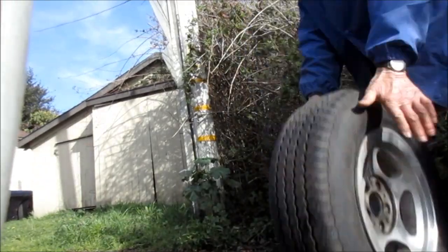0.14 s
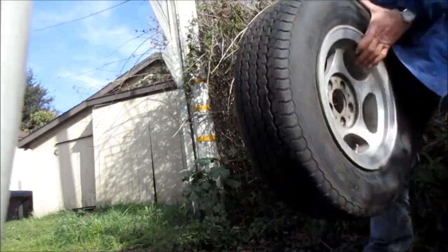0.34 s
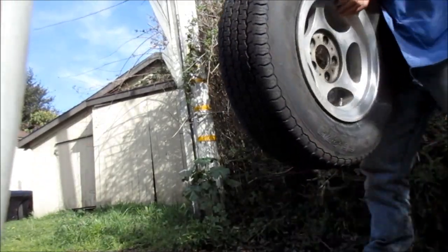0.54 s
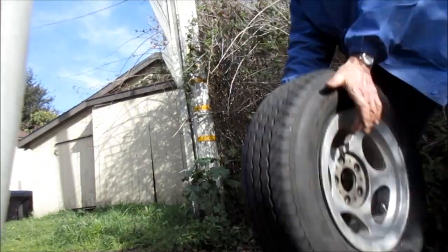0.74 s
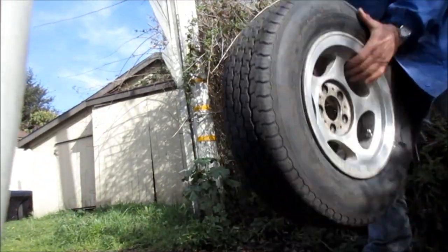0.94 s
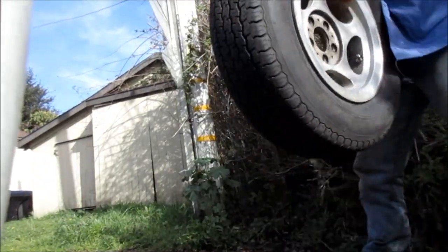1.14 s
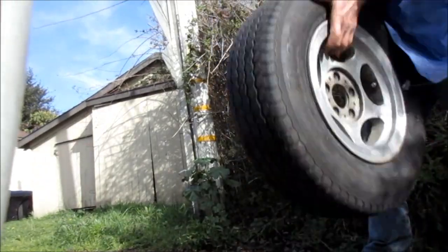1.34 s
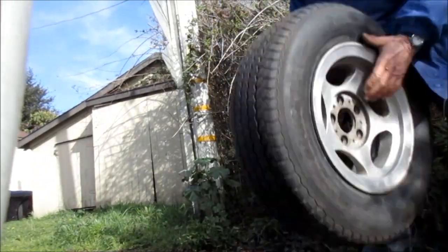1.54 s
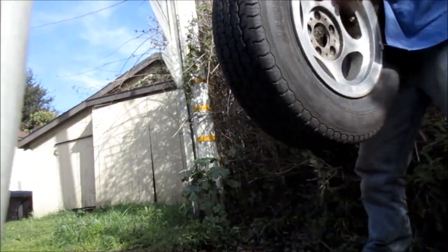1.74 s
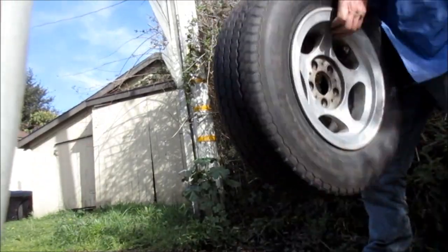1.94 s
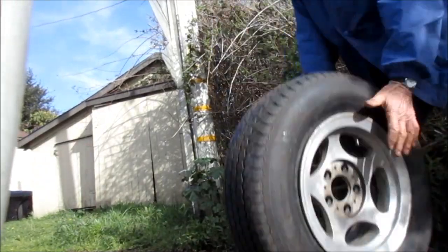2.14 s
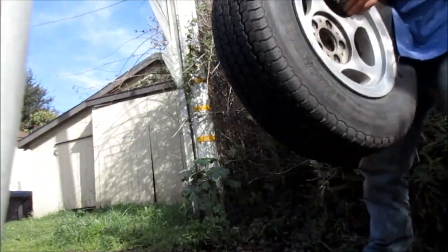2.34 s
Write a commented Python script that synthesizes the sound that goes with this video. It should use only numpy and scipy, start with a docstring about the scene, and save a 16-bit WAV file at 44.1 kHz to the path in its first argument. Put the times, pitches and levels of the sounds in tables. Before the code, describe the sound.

Four slapping thuds of a bounced car tire, with a faint jacket swish between them.

```python
"""A bouncing car tire

A tire on an alloy wheel is bounced four times on hard ground in a quiet yard. Each landing
squeezes air from under the tread with a sharp slap, crunches grit, makes the tire's body thud
and leaves the wheel ringing faintly. Between bounces, hands pat the rubber and a nylon jacket
swishes and squeaks, over a low outdoor hum."""
import sys
import numpy as np
from scipy import signal
from scipy.fft import rfft, irfft
from scipy.io import wavfile

SR = 44100
rng = np.random.default_rng(int(sys.argv[2]) if len(sys.argv) > 2 else 0)


def to_wav(sig):
    """Store sig (one row per channel, or 1-D mono) as 16-bit WAV at the path in sys.argv[1].

    Samples outside -1..1 are clipped; the rate is SR.
    """
    pcm = np.clip(np.atleast_2d(sig), -1, 1) * 32767
    pcm = np.round(pcm).astype(np.int16)
    wavfile.write(sys.argv[1], SR, pcm.T)  # frames by channels


N = 110250
TIME = np.arange(N) / SR

# The four landings and the strength of each part of their sound. Columns: start_s, slap_db, rise_ms,
# groove_db, second_contact_db, thud_db, knock_db, scrub_db, crunch_db, wheel_db
LANDINGS = [(.2323, -4, 0.2, -8.5, -1.5, -1.5, -34, -31, -27.5, -45.5),
            (.8596, -3.5, 0.13, -5.5, -13, -3, -39, -34, -30, -45.5),
            (1.5010, -8.5, 0.16, -4.5, -13, -5.5, -33.5, -33.5, -33, -55),
            (2.1356, -17.5, 0.18, -9, -16, -5, -22.5, -33.5, -29, -50.5)]


def tire():
    """Each landing slaps, flattens the tread and sets the grooves, body and sidewall ringing."""
    # Notes of the tire's body and the air inside it: pitch_hz, relative_db, fade_s
    body_notes = [(81, -24.5, 0.15), (159, -26.5, 0.18), (196.4, -38.5, 0.21), (260, -24, 0.051),
                  (295.3, -29, 0.14), (325.4, -26.5, 0.086), (370, -65, 0.044), (460, -34, 0.09),
                  (513, -39, 0.088), (624, -39, 0.062), (723, -48, 0.069)]
    # Notes of the air in the tread grooves: pitch_hz, relative_db, fade_s
    groove_notes = [(1220, -7.5, 0.0086), (1988, -0.5, 0.0051), (1664, -23, 0.055), (929, -31.5, .06),
                    (1310, -25, 0.078)]
    belt_note = (119, -28.5, 0.29)  # the lasting low boom of the belt under the tread
    squash_note = (44.7, -19, 0.12)  # the whole wheel bobs on its springy sidewall
    knock_hz, knock_fade_s = 319.6, 0.1
    out = np.zeros(N)
    for start, slap_db, rise_ms, groove_db, second_contact_db, thud_db, knock_db, *_ in LANDINGS:
        out += from_db(slap_db) * slap(start, rise_ms)
        out -= from_db(groove_db) * ring(start, groove_notes)
        # The rest of the tread lands a moment later.
        out -= from_db(second_contact_db) * bump(start + 0.00212, width_ms=0.17)
        bulge = from_db(-19) * bump(start + 0.00406, width_ms=0.55)  # the sidewall pushes out
        returning_wave = from_db(-26) * bump(start + 0.0229, width_ms=0.81)  # once round the tread
        body = ring(start, body_notes + [belt_note])
        out += from_db(thud_db) * (ring(start, [squash_note]) + bulge + returning_wave - body)
        out += ring(start, [(knock_hz, knock_db, knock_fade_s)])  # the sidewall knocks
    return out


def slap(start, rise_ms):
    """Pressure climbs as air is squeezed from under the tread, then snaps into suction."""
    suction_share, suction_ms = 0.32, 0.05
    ms = (TIME - start) * 1000
    return pulse(-ms / rise_ms) - suction_share * pulse(ms / suction_ms)


def wheel():
    """The metal wheel rings with one long pure note, stopped and struck anew by every landing."""
    pitch_hz, fade_s = 290.3, 3.05
    out = ring(0, [(pitch_hz, -54.5, fade_s)])  # already ringing faintly at the start
    for start, *_, wheel_db in LANDINGS:
        out = out * (TIME < start) + ring(start, [(pitch_hz, wheel_db, fade_s)])
    return out


def grit():
    """Grit crunches at first touch, is scrubbed under the squashed tire and ticks as it lifts off."""
    # Tone of the tread scrubbing on grit: pitch_hz, relative_db
    scrub_tone = [(300, 18), (600, 10), (1000, 3.5), (1400, -6), (1900, -1), (2700, -8), (4000, -21.5),
                  (8000, -65), (16000, -59)]
    # Tone of the crunching grit: pitch_hz, relative_db
    crunch_tone = [(500, 3), (1900, 10), (3500, -4), (7000, -11.5), (12000, -21.5), (16000, -32)]
    scrub = crunch = 0
    for start, *_, scrub_db, crunch_db, _ in LANDINGS:
        scrub += from_db(scrub_db) * decay(start, fade_s=0.096, hold_s=0.021)
        lift_off = from_db(-40.5) * decay(start + 0.0222, fade_s=0.016)
        crunch += from_db(crunch_db) * decay(start, fade_s=0.052) + lift_off
    return scrub * noise(scrub_tone) + crunch * noise(crunch_tone)


def stones():
    """Small stones snap as the tread hits them, each with a tiny high ping."""
    # Cracking stones: start_s, level_db, pitch_hz, fade_s
    snaps = [(0.2326, -23.5, 5460, 0.0046), (0.2323, -24.5, 7720, 0.0029), (0.2323, -22, 12100, 0.0015),
             (0.8591, -25, 5500, 0.0041), (1.5025, -24, 2970, 0.0088), (1.5019, -21.5, 7500, 0.0016),
             (2.1349, -33.5, 4300, 0.0045)]
    return sum(ring(start, [(hz, db, fade_s)]) for start, db, hz, fade_s in snaps)


def hands():
    """Hands pat the rubber softly, while grit and cloth give small ticks."""
    # Touches of the hands: start_s, level_db
    pat_events = [(.158, -46.5), (.185, -46.5), (0.31, -50.5), (.803, -46), (1.009, -47), (1.585, -51),
                  (1.633, -43), (2.077, -47), (2.223, -45), (2.295, -42.5)]
    # Dull tone of a pat: pitch_hz, relative_db
    pat_tone = [(100, -11), (400, 6.5), (750, 5.5), (1500, -9), (3000, -11.5), (8000, -35), (16000, -35)]
    # Ticks of grit and cloth: start_s, level_db
    tick_events = [(0.295, -51.5), (0.998, -50), (1.27, -46), (1.922, -49), (2.296, -47.5)]
    # Bright tone of a tick: pitch_hz, relative_db
    tick_tone = [(1000, -21), (3000, 3), (7500, 9), (11000, 0.5), (16000, -12)]
    pats, rise_s = 0, 0.0047
    for start, db in pat_events:
        rise = np.clip((TIME - start) / rise_s, 0, 1)
        pats += from_db(db) * rise * decay(start, fade_s=0.12)
    ticks = sum(from_db(db) * decay(start, fade_s=0.018) for start, db in tick_events)
    return pats * noise(pat_tone) + ticks * noise(tick_tone)


def jacket():
    """Nylon sleeves swish and crinkle; fast strokes are brighter."""
    # How the swish rises and falls: time_s, relative_db
    strokes = [(0, -67), (.08, -67.5), (.15, -54.5), (.21, -55.5), (.28, -64.5), (.32, -59), (.38, -48),
               (.47, -54), (.6, -55), (.7, -64), (.78, -57.5), (.84, -56.5), (.91, -62.5), (1.03, -54.5),
               (1.14, -59.5), (1.26, -53.5), (1.34, -67.5), (1.43, -51.5), (1.48, -55.5), (1.55, -65),
               (1.63, -53.5), (1.74, -63.5), (1.84, -59), (1.98, -69.5), (2.09, -60), (2.17, -64.5),
               (2.24, -55), (2.32, -50), (2.38, -61), (2.5, -51.5)]
    # Tone of rubbing nylon: pitch_hz, relative_db
    nylon_tone = [(300, 9), (700, 10.5), (1400, 5.5), (2800, 3), (4500, -0.5), (6500, 3.5), (8000, -0.5),
                  (10000, -3.5), (13000, -10), (16000, -15)]
    # Tone of the bright hiss of fast strokes: pitch_hz, relative_db
    hiss_tone = [(6000, -6), (9000, -4), (13000, -2), (16000, 6)]
    folds_per_s, fold_spread_db, flutter_db = 300, 3, 1.5
    swish_db = np.interp(TIME, *np.transpose(strokes))
    flutter = from_db(flutter_db * smooth(rng.standard_normal(N), hz=118))
    fold_starts = rng.random(N) < folds_per_s / SR
    folds = fold_starts * from_db(fold_spread_db * np.minimum(rng.exponential(1, N), 4))
    crinkle = from_db(-10) * smooth(folds + 1e-18, hz=470) * noise(nylon_tone)
    hiss_db = -68 + 2 * (swish_db - swish_db.max())  # drops 2 dB for each dB the swish drops
    hiss = flutter * from_db(hiss_db) * noise(hiss_tone)
    rubbing = flutter * noise(nylon_tone)
    return from_db(swish_db - 2) * (rubbing + crinkle) + hiss


def squeaks():
    """Nylon ribs zip over each other: a rough whistle whose pitch follows the sliding speed."""
    # Slides of the cloth: start_s, length_s, start_hz, end_hz, level_db
    slides = [(0.124, .035, 7800, 9600, -58), (1.012, .07, 6950, 4560, -59),
              (1.353, 0.023, 2960, 3900, -63.5), (1.351, .03, 3860, 4870, -63.5),
              (1.63, 0.14, 6220, 4300, -68)]
    roughness = smooth(rng.standard_normal(N), hz=300)
    out = np.zeros(N)
    for start, length, start_hz, end_hz, db in slides:
        progress = np.clip((TIME - start) / length, 0, 1)
        hz = start_hz + (end_hz - start_hz) * progress
        whistle = np.sin(2 * np.pi * np.cumsum(hz) / SR)
        out += from_db(db) * np.sin(np.pi * progress) * roughness * whistle
    return out


def yard():
    """Outdoor rumble with a faint low hum that wavers and swells now and then."""
    # Tone of the outdoor rumble: pitch_hz, relative_db
    rumble_tone = [(20, -9), (35, -1), (65, -2.5), (100, -1.5), (200, -3), (400, -7), (800, -11),
                   (1600, -15), (2400, -21.5), (4000, -47.5), (8000, -80), (16000, -36)]
    # Swells of the hum: peak_s, width_s, pitch_hz, level_db
    hum_swells = [(.06, .05, 60.4, -61), (.36, 0.028, 59.8, -53), (0.564, 0.05, 81, -51.5),
                  (.76, 0.044, 75, -54.5), (1.373, 0.033, 78.9, -53), (1.717, 0.099, 63.4, -61),
                  (1.994, 0.071, 61.7, -59.5), (2.436, 0.036, 81, -60)]
    hum_hz, hum_width_hz = 68.5, 33
    low_noise = noise([(30, 26), (100, 21), (300, -37)])
    hum = signal.lfilter(*signal.iirpeak(hum_hz, hum_hz / hum_width_hz, fs=SR), low_noise)
    swells = 0
    for peak_s, width_s, hz, db in hum_swells:
        note = np.sin(2 * np.pi * (hz * TIME + rng.random()))
        swells += from_db(db) * bump(peak_s, width_s * 1000) * note
    return from_db(-56.5) * noise(rumble_tone) + from_db(-63.5) * unit_level(hum) + swells


def from_db(db):
    """Turn decibels into a number to multiply by."""
    return 10 ** (np.asarray(db) / 20)


def unit_level(x):
    """Scale a signal so that its average (rms) level is 1."""
    return x / np.sqrt(np.mean(x ** 2) + 1e-20)


def smooth(x, hz):
    """Soften wiggles faster than hz, then set the average level to 1."""
    return unit_level(signal.sosfilt(signal.butter(2, hz, fs=SR, output="sos"), x))


def noise(tone):
    """Noise of average level 1, shaped by rows of pitch_hz, relative_db."""
    hz, db = np.transpose(tone)
    all_hz = np.maximum(np.arange(N // 2 + 1) * SR / N, 1)
    gain = from_db(np.interp(np.log(all_hz), np.log(hz), db))
    bass_cut = np.minimum(all_hz / hz[0], 1) ** 2
    return unit_level(irfft(rfft(rng.standard_normal(N)) * gain * bass_cut, N))


def decay(start, fade_s, hold_s=0):
    """A level that jumps to 1, stays for hold_s, then falls 60 dB every fade_s."""
    return (TIME >= start) * from_db(-60 * np.maximum(TIME - start - hold_s, 0) / fade_s)


def ring(start, notes):
    """Pure notes that are set off by one blow and die away."""
    return sum(from_db(db) * decay(start, fade_s) * np.sin(2 * np.pi * hz * (TIME - start))
               for hz, db, fade_s in notes)


def pulse(x):
    """A lopsided pulse that starts at x = 0, reaches 1 at x = 1 and tails off."""
    x = np.maximum(x, 0)
    return x * np.exp(1 - x)


def bump(peak_s, width_ms):
    """A soft bell-shaped rise and fall."""
    return np.exp(-.5 * ((TIME - peak_s) * 1000 / width_ms) ** 2)


def scene():
    """All the sounds together, heard from close by in one channel."""
    return (tire() + wheel() + grit() + stones() + hands() + jacket() + squeaks() + yard())[None]


def record(dry):
    """A slight overload rounds off the loudest slaps, and the highest treble is cut."""
    ceiling, cutoff_hz = 0.82, 16000
    rounded = dry / (1 + (abs(dry) / ceiling) ** 8) ** (1 / 8)
    return signal.sosfilt(signal.ellip(10, .2, 70, cutoff_hz, fs=SR, output="sos"), rounded)


dry = scene()
out = record(dry)
to_wav(out)
```